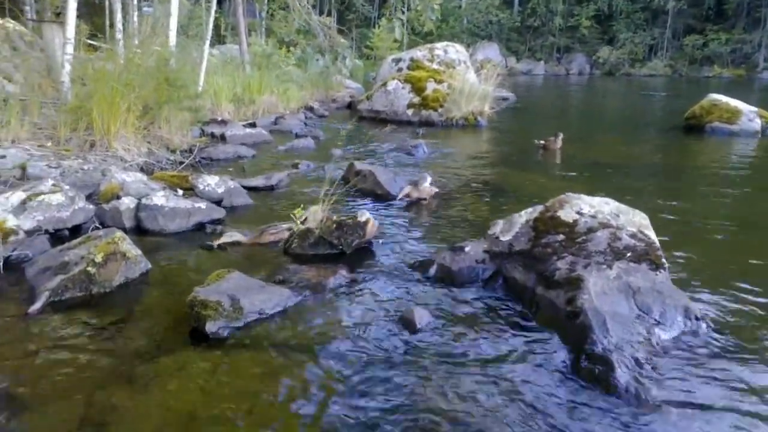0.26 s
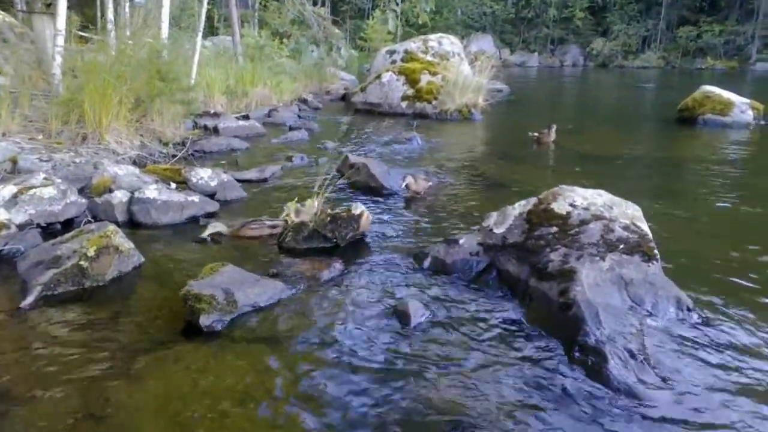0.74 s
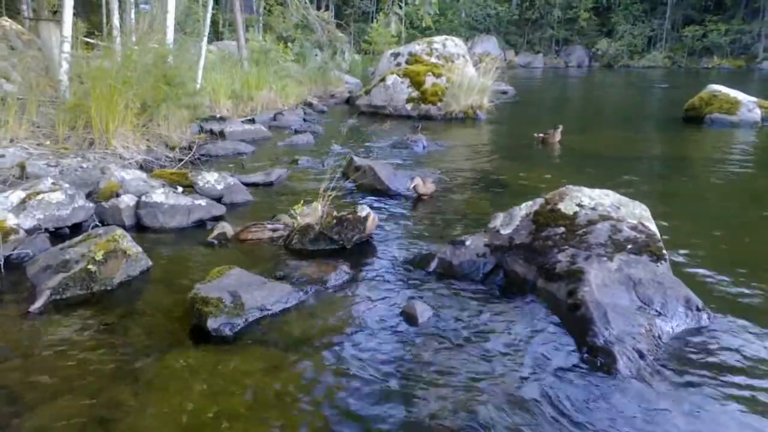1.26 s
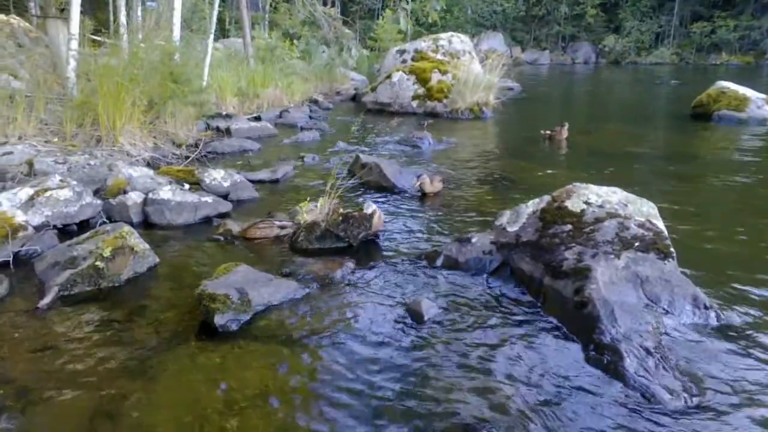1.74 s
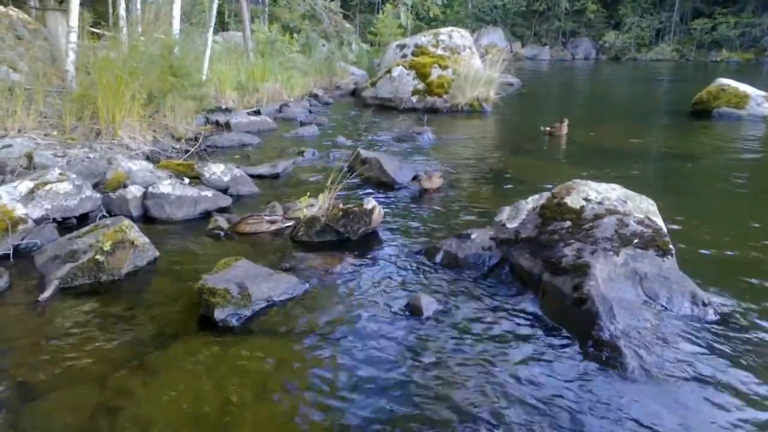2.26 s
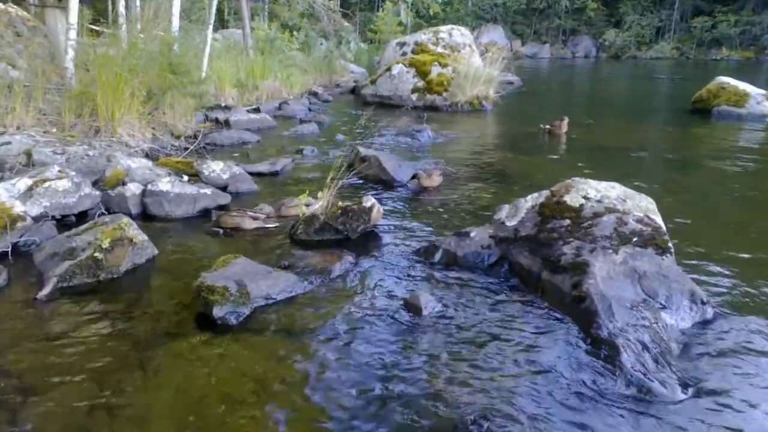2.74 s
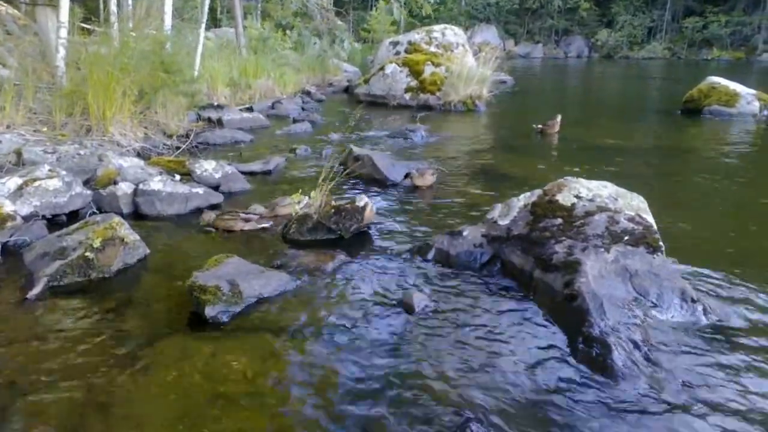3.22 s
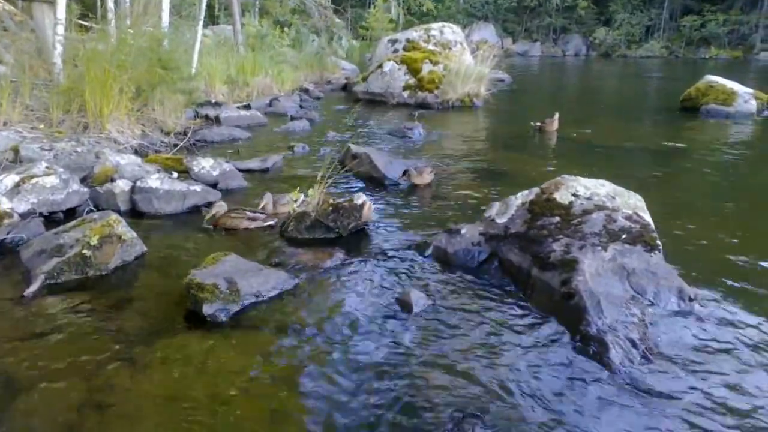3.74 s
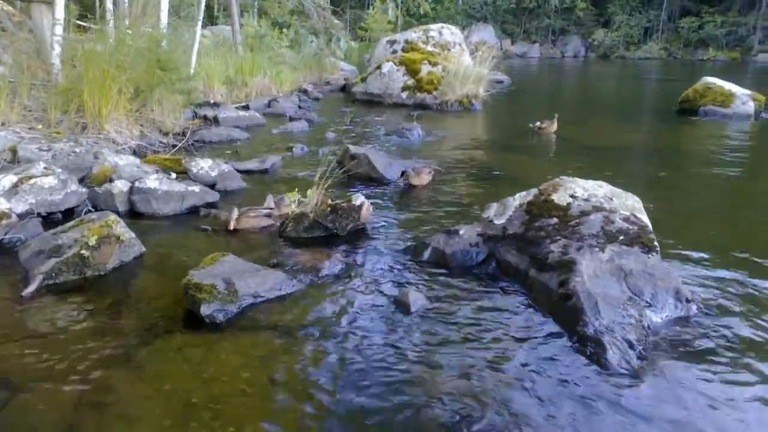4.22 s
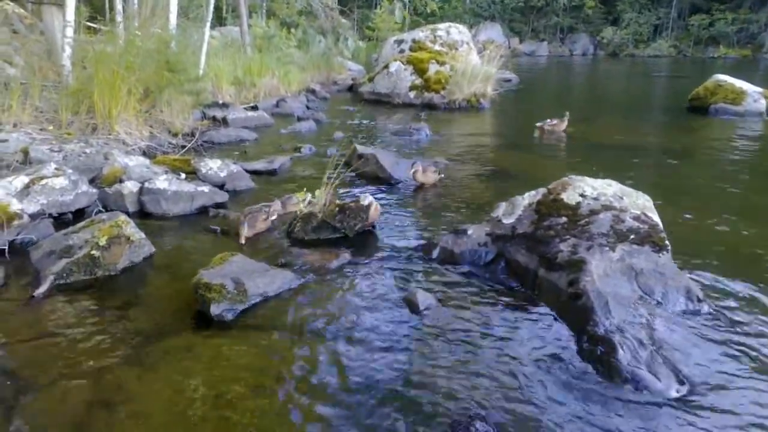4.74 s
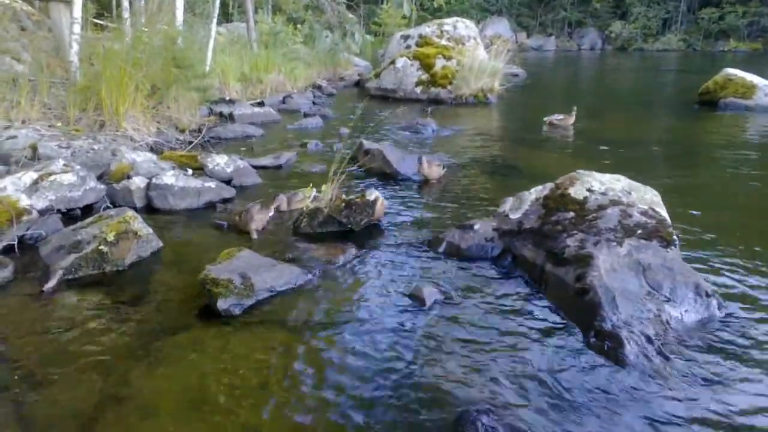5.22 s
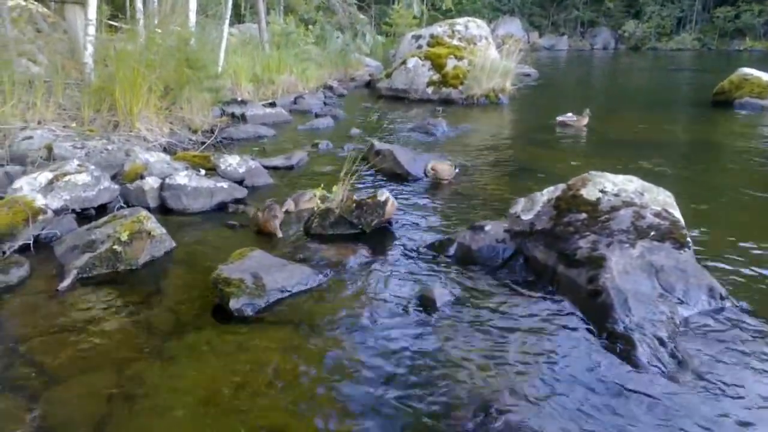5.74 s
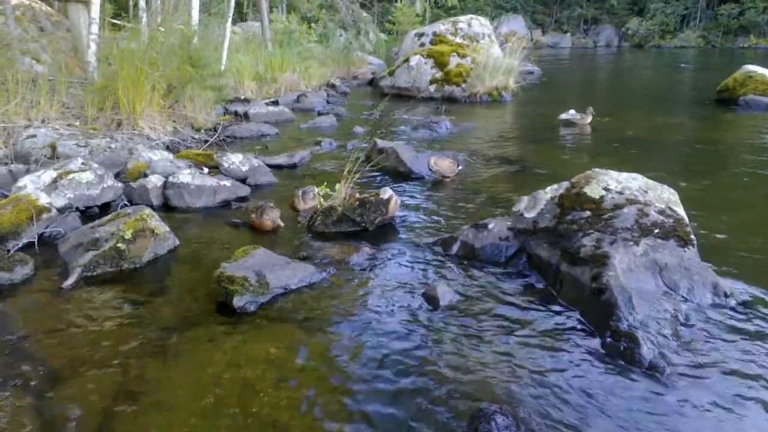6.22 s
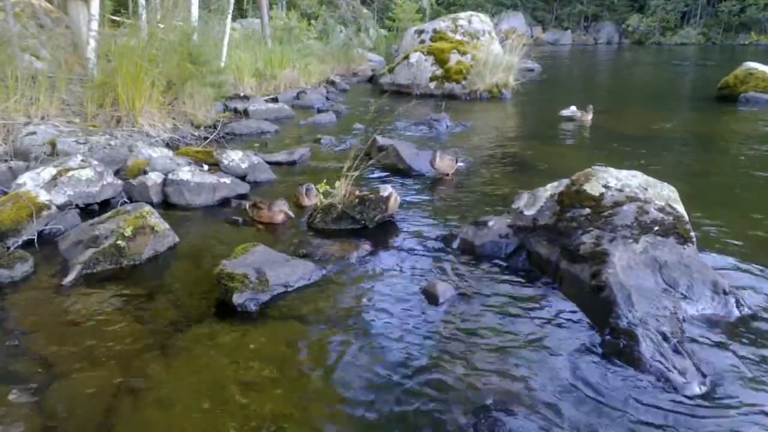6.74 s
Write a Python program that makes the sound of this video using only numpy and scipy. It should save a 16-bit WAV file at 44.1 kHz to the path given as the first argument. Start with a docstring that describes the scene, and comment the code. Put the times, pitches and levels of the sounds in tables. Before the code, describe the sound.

Ducks dabble in shallow water among rocks, a few metres from a hand-held microphone. Wind buffets it throughout with a low, uneven rumble, mostly on the left, over soft hiss and a faint distant hum. A plop opens the scene, and several faint, husky, whistling peeps follow in the first second. A cluster of wet plops and drips comes at about 1.2 to 1.4 seconds, then a brief handling creak on the right at 1.5. Another plop and a single peep sound near 2.1 seconds. Small bubbles and ticking drops continue while the hum swells slightly around 3.3. The wind thumps hardest between 3.7 and 4.5 seconds, and the sharpest plops land at about 4 and 4.5, trailing off in light gurgles. From 6 seconds to the end, near 7, lower plops mix with a few very faint peeps.

```python
"""Ducks peep softly and dabble in shallow water among rocks, a few metres from a hand-held microphone.
Each peep is a husky, arching whistle. Air pockets close with a wet slap and a gliding ring; drops tick.
Wind buffets the microphone's two ports over hiss, a far rumble and a faint drone,
and the case creaks briefly under a finger."""
import sys
import numpy as np
from scipy import signal
from scipy.fft import rfft, irfft
from scipy.io import wavfile
from scipy.ndimage import uniform_filter1d

SR = 44100
rng = np.random.default_rng(int(sys.argv[2]) if len(sys.argv) > 2 else 0)


def put_to_file(sound):
    """Save the sound as 16-bit audio at rate SR, in the file named by the first command-line argument."""
    columns = np.atleast_2d(sound).T  # one column per channel
    safe = np.clip(columns, -1, 1)
    whole_steps = np.round(safe * 32767)
    wavfile.write(sys.argv[1], SR, whole_steps.astype(np.int16))


N = 307377
T = np.arange(N) / SR
SIDES = np.array([[1], [-1]])  # left, right


def undb(db):
    """Decibels to gain."""
    return 10 ** (np.asarray(db) / 20)


def colour(x, points):
    """EQ along a curve of (frequency [Hz], gain [dB])."""
    hz, db = np.transpose(points)
    bin_hz = np.maximum(np.arange(N // 2 + 1) * SR / N, 1)
    return irfft(rfft(x) * undb(np.interp(np.log(bin_hz), np.log(hz), db)), N)


def hiss(points):
    """Noise shaped to a curve of (frequency [Hz], density [dB per Hz])."""
    return colour(rng.standard_normal(N), points) * np.sqrt(SR / 2)


def band(x, hz, width):
    """Resonance with gain 1 at the centre."""
    return signal.lfilter(*signal.iirpeak(hz, hz / width, fs=SR), x)


def walk(rate):
    """Random modulator: values held 1 / rate s and slewed twice; spread near 1."""
    hold = int(SR / rate)
    steps = np.repeat(rng.standard_normal(N // hold + 1), hold)
    return 1.3 * uniform_filter1d(uniform_filter1d(steps, hold), hold)[:N]


def add(out, s, x, pan_db, left_lag=0):
    """Mix a sound in at s seconds; pan_db is left minus right, left_lag is in samples."""
    for ch, i in enumerate((max(int(s * SR + left_lag), 0), int(s * SR))):
        out[ch, i:i + len(x)] += (x * undb(SIDES[ch] * pan_db / 2))[:max(N - i, 0)]


def bubble(hz, t60, rise):
    """A ringing air pocket whose pitch glides and wobbles as the water moves round it."""
    t = np.arange(int(t60 * SR)) / SR
    wobble = uniform_filter1d(rng.standard_normal((2, 8192)), size=150)[:, :len(t)] * np.sqrt(150)
    octaves = rise * t / t60 + 0.032 * wobble[0]
    phase = 2 * np.pi * np.cumsum(hz * 2 ** octaves) / SR
    attack = (1 - np.exp(-t * hz / 1.3)) ** 2  # builds over a few cycles
    return np.sin(phase) * attack * undb(1.8 * wobble[1] - 60 * t / t60)


def burst(hz, width, decay_s):
    """A crack of band-passed noise with a fast attack, peak 1."""
    t = np.arange(4096) / SR
    envelope = np.exp(-t / decay_s) * (1 - np.exp(-t * hz / 1.3))
    crack = band(band(rng.standard_normal(len(t)) * envelope, hz, width), hz, width)
    return crack / np.abs(crack).max()


def plops():
    """Air pockets close in the water with a wet slap and a ring; faint ripples burble between them."""
    # pockets: (time [s], ring level [dB], pitch [Hz], t60 [s], rise over the ring [octaves],
    # slap level [dB], pan [dB], left lag [samples])
    pockets = [(0.0, -42, 564, 0.063, 0.5, -53, 6, -4), (0.535, -49, 1330, 0.048, 0.8, -55, -5, 9.5),
               (0.536, -50, 580, 0.038, -0.5, -54, -1, 17), (1.13, -65, 804, 0.12, 4.5, -63, -12, 5),
               (1.151, -49, 324, 0.052, -0.2, -60, -2, 9), (1.2355, -26, 480, 0.0088, 0, -42, -14.5, 10),
               (1.244, -46, 300, 0.045, -1.5, -52, -20, 9), (1.265, -44.5, 418, 0.13, -0.5, -60, -2, 8),
               (1.38, -35, 586, 0.024, -0.5, -50, 0, 14), (1.907, -53, 1046, 0.058, 1.5, -62, -1, -6),
               (1.969, -52.5, 342, 0.086, -0.2, -75, 1, 11), (2.086, -39, 877, 0.048, 1.5, -58, -1, -5),
               (2.294, -55.5, 1064, 0.057, 1, -65, -2, -3), (2.874, -57, 614, 0.088, -0.5, -59.5, -6, 8),
               (3.017, -52.5, 902, 0.067, 2, -74, -1, -7), (3.108, -63, 465, 0.096, 0.5, -79, -9, 6),
               (3.23, -61, 925, 0.077, 3.5, -65, 2, 6), (3.44, -61, 1004, 0.073, 4, -62.5, -3, 6),
               (3.962, -29.5, 1299, 0.031, -0.3, -50, 1, 4), (3.98, -49, 1187, 0.06, 0.2, -59, -3, 8),
               (4.19, -34, 718, 0.036, 0, -51, -4.5, 13), (4.21, -62, 516, 0.039, .3, -50, 0, 13),
               (4.473, -22.5, 864, 0.014, 1.3, -43, 0, 13), (4.479, -39.5, 832, 0.12, 0, -51.5, 2, 5.5),
               (4.579, -55, 930, .035, 2, -72, -2.5, 2), (4.613, -53, 890, 0.064, 2.3, -71, -5, 8),
               (4.622, -54, 710, .05, 0.5, -73, -3, 8), (4.672, -56.5, 1035, 0.08, 1, -74, -6, 4),
               (4.764, -57, 1050, 0.037, -0.5, -75, -9, 4), (4.82, -61, 1220, 0.056, 2, -76, 1, 3),
               (4.969, -47.5, 787, 0.045, 2.3, -70, 0, 2), (4.985, -61, 846, 0.12, 2, -70, 1.5, 6),
               (5.005, -57, 680, 0.043, 0.5, -72, 0, 8), (5.318, -59, 425, 0.062, 0.1, -75, 2.5, 6),
               (5.45, -59.5, 910, 0.061, 4, -77, -6, 6), (5.586, -57.5, 950, 0.07, -0.5, -78, -1, 9),
               (6.251, -37.5, 310, 0.03, 0.1, -53, 1, 11), (6.253, -42, 650, 0.021, 1.5, -58, 1, 6),
               (6.313, -51, 1330, 0.039, 0.6, -62, -1, -2), (6.438, -36, 340, 0.027, 0.5, -55, -4, 7),
               (6.452, -52, 1133, 0.05, 0.5, -59, 0, 6), (6.484, -38, 378, 0.02, -0.5, -64, -2.5, -2),
               (6.57, -45, 323, 0.025, 0, -74, -19, 6), (6.699, -35.5, 396, 0.028, -0.9, -47.5, 0, 13),
               (6.75, -49, 950, 0.038, 1.7, -60, -1, -5), (6.874, -59, 1420, .04, .3, -79, 2, 0)]
    out = np.zeros((2, N))
    for s, db, hz, t60, rise, slap_db, pan_db, lag in pockets:
        add(out, s, undb(db) * bubble(hz, t60, rise), pan_db, lag)
        slap_hz = 603 * (hz / 700) ** 0.13  # loosely tracks the pocket's pitch
        slap = burst(slap_hz, width=.9 * slap_hz, decay_s=0.29 * t60)
        add(out, s, undb(slap_db) * slap, pan_db, lag)
    for when, pitch, faintness, side in rng.random((160, 4)):
        db = -75 - 4.9 * np.log(max(faintness, 1 / 20))
        ripple = undb(db) * bubble(350 * 2 ** (2.6 * pitch), t60=0.027, rise=0.31)
        add(out, when * N / SR, ripple, pan_db=8 * (side - .5), left_lag=12 * (1 - side))
    return out


def wind():
    """Separate turbulence flutters at each port; gusts thump on the left one."""
    # breeze on the ports: (time [s], left level [dB], right level [dB])
    breeze_levels = [(0, -50, -59), (.4, -56, -56), (.55, -42, -51), (.85, -43, -47), (1.25, -54, -48.5),
                     (1.45, -40, -71), (1.9, -41.5, -45), (2.15, -49.5, -46.5), (2.6, -50.5, -60),
                     (3.15, -58, -60), (3.6, -36.5, -58), (4.05, -51, -75), (4.3, -34, -60),
                     (4.6, -39, -40), (4.75, -50.5, -49), (5.0, -42.5, -46), (5.45, -55, -44),
                     (5.9, -44.5, -50.5), (6.3, -50, -49), (6.55, -53, -46), (6.97, -42.5, -65)]
    # tone of the turbulence: (frequency [Hz], relative density [dB])
    buffet_curve = [(10, 3), (20, 11.5), (40, -3), (70, -5.5), (120, -33), (250, -45.5), (500, -72),
                    (1000, -140)]
    # gusts striking the left port: (centre time [s], length [s], level [dB])
    gusts = [(0.578, 0.036, -41), (0.716, 0.055, -30.5), (0.976, 0.076, -43), (1.08, 0.049, -38),
             (1.43, 0.097, -35.5), (1.778, 0.12, -29.5), (1.983, 0.028, -37), (2.553, 0.039, -32),
             (2.709, 0.064, -35.5), (2.853, 0.054, -40.5), (3.088, 0.039, -30), (3.248, 0.055, -40.5),
             (3.323, 0.033, -33), (3.48, 0.046, -36), (3.687, 0.023, -26.5), (3.78, 0.068, -28.5),
             (3.855, 0.042, -35.5), (3.982, 0.029, -33), (4.2, 0.029, -26.5), (4.426, 0.058, -22.5),
             (4.88, 0.14, -33.5), (5.077, 0.06, -39.5), (5.726, 0.044, -43), (5.916, 0.04, -34),
             (6.495, 0.06, -38), (6.732, 0.049, -37), (6.845, 0.021, -30)]
    turbulence = np.array([hiss(buffet_curve) for _ in range(2)])
    power = uniform_filter1d(uniform_filter1d(turbulence ** 2, size=3000), size=3000)
    s, left_db, right_db = np.transpose(breeze_levels)
    flutter_db, thump_port_db = 3, [[0], [-23]]
    breeze = undb([np.interp(T, s, db) + flutter_db * walk(7.4) for db in (left_db, right_db)])
    thumps = sum(undb(db) * np.exp(-.5 * ((T - at) / (0.27 * length)) ** 2) for at, length, db in gusts)
    return turbulence / np.sqrt(power) * np.hypot(breeze, thumps * undb(thump_port_db))


def air():
    """A bed of hiss, wide in the treble, over a swelling far rumble that both ports largely share."""
    # shore and microphone hiss: (frequency [Hz], density [dB per Hz])
    bed_curve = [(25, -75.5), (60, -73.5), (100, -77.5), (200, -89), (300, -97.5), (400, -105), (600, -106),
                 (1100, -101), (1650, -105), (2500, -105), (4800, -105), (7500, -110), (11000, -103),
                 (14000, -97), (16000, -103)]
    # likeness of the two ports: (frequency [Hz], correlation [0-1])
    likeness = [(25, .8), (130, .88), (300, .75), (450, .75), (700, .65), (1400, .1), (3000, 0)]
    # swells of the far rumble: (time [s], relative level [dB])
    swells = [(0.0, -65), (0.49, -72.5), (0.64, -66), (0.99, -71.5), (1.26, -64), (1.49, -69), (1.67, -70),
              (2.35, -69.5), (2.66, -69), (3.05, -64.5), (4.1, -68.5), (4.42, -69), (5.57, -70),
              (5.69, -71.5), (6.27, -69.5), (6.54, -66), (6.97, -73)]
    hz, density_db = np.transpose(bed_curve)
    like_hz, like = np.transpose(likeness)
    shared = np.interp(np.log(hz), np.log(like_hz), like)
    mid = hiss(np.c_[hz, density_db + 10 * np.log10((1 + shared) / 2)])
    side = hiss(np.c_[hz, density_db + 10 * np.log10((1 - shared) / 2)])
    bed = mid + SIDES * side
    bass = signal.sosfiltfilt(signal.butter(2, 800, fs=SR, output="sos"), bed)
    mids = signal.sosfiltfilt(signal.butter(2, 2300, fs=SR, output="sos"), bed - bass)
    treble = bed - bass - mids
    flicker = undb(.3 * walk(5.3) + .5 * walk(11))
    lapping = undb(1.6 * walk(3) + 1.8 * walk(14))  # water makes the mids come and go
    s, db = np.transpose(swells)
    swell = undb(np.interp(T, s, db - db.mean()) + 0.71 * walk(3.72))
    return treble * flicker + mids * lapping + bass * swell


def drone():
    """Something far off hums in narrow, wavering bands; one low tone swells for a while."""
    # bands of the hum: (centre [Hz], width [Hz], level [dB])
    hum_bands = [(62.64, 0.88, -64.5), (84, 17, -84), (175.6, 3.1, -74.5), (317, 5.1, -82),
                 (335.2, 11, -84)]
    # swelling tone: (time [s], pitch [Hz], level [dB])
    swell = [(2.3, 141, -84), (2.376, 145.9, -67.5), (3.276, 146.2, -56.5), (3.328, 145.5, -60),
             (3.366, 147.8, -57.5), (3.608, 143.5, -68), (3.732, 151, -62), (3.75, 157, -73)]
    hum = 0
    for hz, width, db in hum_bands:
        line = band(rng.standard_normal(N), hz, width)
        hum += undb(db + 2.4 * walk(1.64)) * line / line.std()
    s, hz, db = np.transpose(swell)
    envelope = np.interp(T, [s[0] - .2, *s, s[-1] + 0.16], [0, *(np.sqrt(2) * undb(db)), 0])
    pitch_hz = np.interp(T, s, hz) + 1.5 * walk(7)
    return hum + envelope * np.sin(2 * np.pi * np.cumsum(pitch_hz) / SR)


def peeps():
    """Ducks whistle: a wavering, husky tone that arches in pitch, with a weak octave overtone."""
    # calls: (time [s], length [s], top pitch [Hz], level [dB], start below top [octaves],
    # end below top [octaves], overtone [dB], top position [share of length])
    calls = [(0.049, 0.068, 1600, -60, 0.25, 0.4, -21, 0.52), (0.158, 0.044, 983, -63, 0.26, 0.16, -25, .5),
             (0.227, 0.076, 1977, -60.5, 0.87, 0.65, -9, 0.56),
             (0.247, 0.053, 2190, -67, 0.14, -0.12, -8, 0.43),
             (0.43, 0.093, 1593, -64, 0.33, 0.6, -13, 0.39),
             (0.63, 0.085, 1530, -63.5, 0.3, 0.45, -15, 0.47),
             (0.689, 0.044, 977, -61.5, 0.44, 0.15, -25, .42),
             (2.077, 0.043, 1039, -55.5, 0.34, 0.66, -28, 0.49),
             (4.36, 0.077, 1566, -72, 0.33, 0.65, -25, .35), (4.74, 0.072, 1890, -73, .05, .35, -25, .35),
             (6.041, 0.024, 2130, -68.5, 0.27, -0.083, -24, 0.37),
             (6.308, 0.076, 1970, -67.5, 0.79, 0.8, -20, 0.36),
             (6.494, .084, 2090, -72, .6, 0.77, -20, 0.43), (6.683, 0.067, 2120, -71, 0.62, 0.45, -20, 0.4),
             (6.881, 0.068, 2036, -72, 0.16, 0.4, -18, .35)]
    arch_power, fade_db = 2.2, -4
    out = np.zeros((2, N))
    tremble, waver = undb(1.5 * walk(150)), 2 ** (.011 * walk(200))
    husk = 1 + .33 * walk(700)  # fast modulation puts breath round the tone
    for s, length, top_hz, db, below_start, below_end, overtone_db, top_at in calls:
        progress = np.arange(int(length * SR)) / (length * SR)
        span = int(s * SR) + np.arange(len(progress))
        onset = below_start * np.abs(1 - progress / top_at) ** arch_power
        tail = below_end * np.abs((progress - top_at) / (1 - top_at)) ** arch_power
        octaves_below = np.where(progress < top_at, onset, tail)
        phase = 2 * np.pi * np.cumsum(top_hz * 2 ** -octaves_below * waver[span]) / SR
        tone = np.sqrt(2) * (np.sin(phase) + undb(overtone_db) * np.sin(2 * phase))
        envelope = undb(db + fade_db * progress) * signal.windows.tukey(len(span), .45)
        add(out, s, tone * envelope * tremble[span] * husk[span], pan_db=2.5, left_lag=-3)
    return out


def ticks():
    """Drops crack brightly on water and stone, over a faint, fine spray."""
    # drops: (time [s], level [dB], centre [Hz], pan [dB], decay [s], width [multiple of centre])
    drops = [(0.137, -52.5, 2350, 8, 0.0063, .5), (0.681, -55.5, 2200, 5, 0.005, .4),
             (0.785, -52.5, 1700, 1, 0.0039, 1.2), (1.081, -52, 5800, 1, 0.0013, .7),
             (1.237, -49.5, 2680, -3, 0.004, 1.0), (1.26, -56.5, 6000, -8, 0.00081, .3),
             (1.353, -59, 1990, 1, 0.0038, .4), (1.738, -62, 6000, -6, .003, .2),
             (2.244, -55, 2170, -11, 0.0057, .5), (2.905, -51.5, 6700, 2, 0.0017, .4),
             (3.03, -48, 6000, 8, 0.0012, .8), (3.031, -54, 4600, 5, 0.004, .25),
             (3.294, -59, 3820, 1, .002, .4), (3.293, -58, 8200, 1, .001, .3),
             (3.375, -59, 7200, 0, .001, .35), (3.16, -57, 6500, 0, .001, .9),
             (3.96, -51, 4370, -3, 0.012, 1.2), (4.472, -51.5, 2980, 1, 0.0032, 1.0),
             (4.474, -52.5, 7500, -4, .002, .9), (4.755, -56, 2300, 10, 0.0022, .8),
             (5.501, -48.5, 4130, -2, 0.0022, .35), (5.816, -59, 3620, 2, 0.0051, .15),
             (6.274, -60, 2500, 5, 0.0018, .9), (6.308, -54, 1800, 8, .0025, 1.1),
             (6.589, -57, 1970, 6, 0.0023, .7)]
    out = np.zeros((2, N))
    for s, db, hz, pan_db, decay_s, width_ratio in drops:
        add(out, s, undb(db) * burst(hz, width_ratio * hz, decay_s), pan_db)
    for when, pitch, size in rng.random((120, 3)):
        spray = burst(2500 * 2 ** (1.6 * pitch), width=1500, decay_s=.0015)
        add(out, when * N / SR, undb(-70 + 6 * size) * spray, pan_db=0)
    return out


def creaks():
    """A finger slips on the case beside the right port; each slip knocks it into a brief ring."""
    # finger slips: (time [s], level [dB])
    slips = [(1.4245, -54), (1.4302, -52), (1.4327, -45.5), (1.4341, -54), (1.4354, -49), (1.4376, -42.5),
             (1.4399, -45), (1.4423, -57), (1.4963, -35)]
    # resonances of the case: (centre [Hz], width [Hz], gain [dB])
    modes = [(705, 640, -10.5), (2420, 370, -17.5), (3370, 1700, -3), (5800, 1400, -7.5), (9000, 2000, -7)]
    out, knock = np.zeros((2, N)), signal.unit_impulse(512)
    rings = np.array([band(band(knock, hz, width), hz, width) for hz, width, _ in modes])
    rings /= np.abs(rings).max(axis=1, keepdims=True)
    mode_db = np.array(modes)[:, 2]
    for s, db in slips:
        scatter_db = 2 * rng.standard_normal(len(modes))
        add(out, s, undb(db + mode_db + scatter_db) @ rings, pan_db=-14)
    return out


def scene():
    """All sources as they reach the two ports."""
    far = air() + drone()
    far[0] = np.roll(far[0], 9)  # far sounds lie to the right and reach the left port later
    return plops() + peeps() + ticks() + creaks() + wind() + far


def record(dry):
    """The right port rings in the presence range; a steep high cut trims both channels."""
    # resonance of the right port: (frequency [Hz], gain [dB])
    port_curve = [(700, -0.5), (1600, 1.5), (2300, 10), (3100, 15.5), (4100, 15), (5200, 10), (5950, 15),
                  (7000, 9), (8500, 5.5), (11000, 3), (15000, 0.5)]
    ports = np.array([dry[0], colour(dry[1], port_curve)])
    high_cut = signal.ellip(12, .2, 80, 15760, fs=SR, output="sos")
    return signal.sosfilt(high_cut, ports)


dry = scene()
out = record(dry)
put_to_file(out)
```